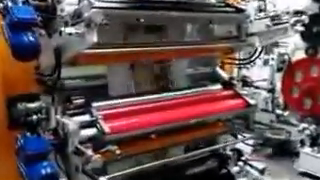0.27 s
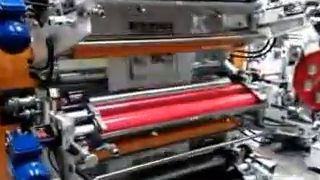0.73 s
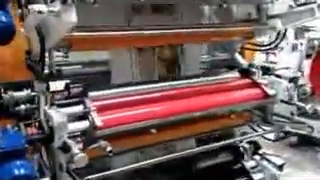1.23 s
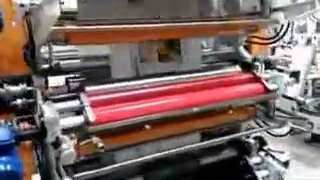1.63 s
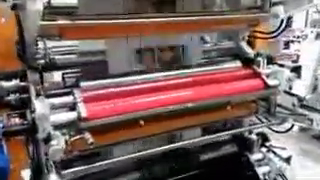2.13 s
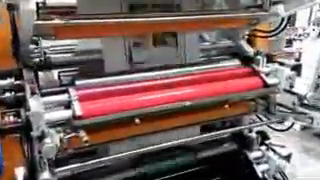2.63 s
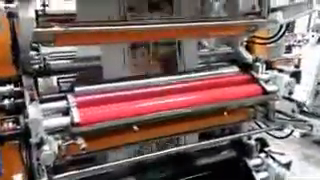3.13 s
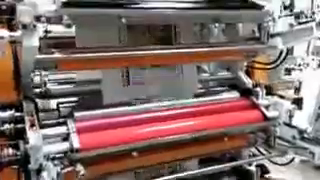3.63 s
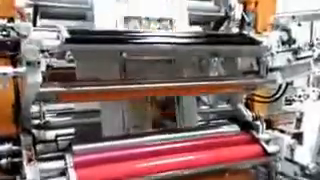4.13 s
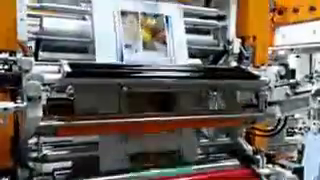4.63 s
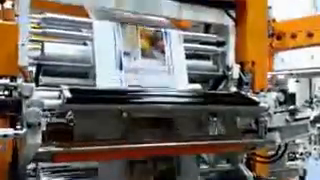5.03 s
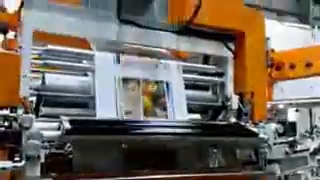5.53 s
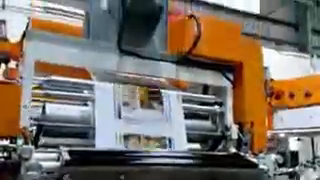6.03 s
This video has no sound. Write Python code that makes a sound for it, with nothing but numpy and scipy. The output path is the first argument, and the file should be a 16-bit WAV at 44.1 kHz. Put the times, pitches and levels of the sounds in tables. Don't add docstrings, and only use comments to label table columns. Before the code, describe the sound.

From 0 to about 6.3 seconds a roll-fed printing press runs without pause in a large factory hall. A thick, fairly level fan roar joins thin air hiss and dense metallic gear rattle, ringing mostly in the mid range. The rattle, hum and hiss swell gently about five times a second, never quite evenly. At 0.1 seconds an air valve vents with a soft-edged, breathy puff; at 0.65 a shorter, sharper one follows, both fading over the next second or so. Brief harder rattles poke out around 0.8, 1.4, 2.8, 3.7 and 4.7. Hiss is slightly fuller near 3. Wavering motor hum and a faint high whine grow clearer around 5 to 6. A small mono camera microphone moves along the press, with dull, slightly watery treble. It ends still running.

```python
import sys
import numpy as np
from scipy import signal
from scipy.fft import rfft, irfft, dct, next_fast_len
from scipy.io import wavfile
from scipy.ndimage import uniform_filter1d

SR = 44100
rng = np.random.default_rng(int(sys.argv[2]) if len(sys.argv) > 2 else 0)


def persist_wave(psi):
    counts = np.round(np.clip(psi, -1, 1) * 32767).astype(np.int16)
    wavfile.write(sys.argv[1], SR, np.atleast_2d(counts).T)


def level_to_linear(level):
    exponent = np.asarray(level, float) / 20
    return 10 ** exponent


N = 276948
TURN_HZ, TURN_PEAK_S = 5.09, 1.064


def rms_one(x):
    return x / np.sqrt(np.mean(x ** 2) + 1e-20)


def drift(rate_hz):
    every = 40
    r = np.exp(-2 * np.pi * rate_hz * every / SR)
    sparse = rng.standard_normal(N // every + 2002)
    slow = signal.lfilter([1], [1, -2 * r, r * r], sparse)[2000:]
    return np.interp(np.arange(N) / every, np.arange(len(slow)), rms_one(slow - slow.mean()))


def coloured(spectrum):
    size = next_fast_len(N)
    hz, level_db = np.transpose(spectrum)
    log_hz = np.log(np.arange(size // 2 + 1) * SR / size + 1)
    shape = level_to_linear(np.interp(log_hz, np.log(hz), level_db, left=-90, right=-90))
    return rms_one(irfft(rfft(rng.standard_normal(size)) * shape, size)[:N])


def resonance(x, hz, width_hz):
    r = np.exp(-np.pi * width_hz / SR)
    zeros = np.array([1, 0, -1]) * (1 - r * r) / 2
    return signal.lfilter(zeros, [1, -2 * r * np.cos(2 * np.pi * hz / SR), r * r], x)


def in_time(rows):
    s, *columns = np.transpose(rows)
    return [np.interp(np.arange(N) / SR, s, column) for column in columns]


def bump(at_s, half_width_s):
    return np.exp(-((np.arange(N) / SR - at_s) / half_width_s) ** 2)


def turn(t):
    return np.cos(2 * np.pi * TURN_HZ * (t - TURN_PEAK_S)) * (1 + 0.23 * drift(3.6))


# time_s, roar_db, hiss_db
WALK = [(0, -25, -35), (1, -24, -35), (2, -25, -33.5), (3, -24.5, -33), (3.6, -24.5, -35),
        (4.5, -25, -35.5), (5.4, -24.5, -35), (6.28, -24, -36)]


def walk_levels_db():
    return in_time(WALK)


# freq_hz, density_db_per_hz
FAN_SPECTRUM = [(12, -62), (20, -36.5), (135, -4), (270, -8), (368, -4), (424, -6.5), (467, -5), (700, -5),
                (1330, -4), (1860, -1), (2050, -6), (2310, -2), (4840, -9.5), (6000, -25.5), (7800, -54),
                (13200, -120)]


def dryer_fans(load, roar_db):
    return coloured(FAN_SPECTRUM) * level_to_linear(roar_db + 0.29 * load + 0.3 * drift(4.0))


# freq_hz, density_db_per_hz
KNIFE_SPECTRUM = [(2500, -21), (4000, -6), (5200, -11), (6200, -13.5), (7000, -20), (7800, -23),
                  (8050, -21), (8200, -31.5), (8400, -25), (8800, -33.5)]


def air_knives(load, hiss_db):
    return coloured(KNIFE_SPECTRUM) * level_to_linear(hiss_db + 1.1 * load + 0.44 * drift(6.7))


# mean_db, swell_per_turn_db
TRAIN_LEVELS = [
    (-30.5, 1.1),
    (-32.5, 2.6),
    (-31.5, 0.28),
]
# time_s, drive_side_share, ink_rollers_share
TIGHTNESS = [(0, .3, .5), (1, .7, .6), (2, 0.94, .6), (2.7, .5, 1.5), (4, 1.3, 1.4), (4.4, 0.96, .4),
             (5.2, 0.98, .5), (6.28, 1.1, .4)]
# time_s, extra_db
BINDS = [
    [(1.3, 3.5), (1.5, 3.5), (2.64, 0), (4.58, 4.5), (4.83, 5), (5.18, 1), (5.57, 1.5), (6.15, 1)],
    [(.7, 4), (.86, 4.5), (2.24, 2.5), (2.83, 4), (3.21, 1.5), (5.41, 2.5)],
    [(.3, 2.5), (1.25, 4), (2.53, 3.5), (2.98, 2.1), (3.68, 4), (4.65, 3), (5.15, 2.5), (6.25, 3)],
]
BIND_HALF_S = (.045, 0.036, 0.083)


def train_levels_db(load):
    shares = in_time(TIGHTNESS) + [1]
    levels_db = []
    for (mean_db, swell_db), share, binds, half_s in zip(TRAIN_LEVELS, shares, BINDS, BIND_HALF_S):
        bind_db = sum(extra_db * bump(time_s, half_s) for time_s, extra_db in binds)
        levels_db.append(mean_db + swell_db * share * load + 0.5 * drift(4.0) + bind_db)
    return levels_db


# freq_hz, width_hz, under_train_db, swell_share
FRAME = [
    [(142.3, 39, -15.5, 0.22), (425.3, 28, -14, 1.6), (514.4, 50, -13, 0.33), (842, 60, -15.5, 0.58),
     (965, 50, -15.5, 0.37), (1084.3, 45, -8.5, 0.81), (1196, 40, -10, 1.1), (1275.5, 45, -6.5, 0.61),
     (1381, 75, -5, 1.1), (1474, 25, -11, 2.5)],
    [(1611.5, 50, -4, 1.2), (1702, 40, -5, 1.6), (5599, 30, -21, 0.65)],
    [(1963, 44, -6, 0.21), (2024, 55, -9.5, 0.34), (2096.5, 50, -3, 0.49), (2720, 180, -11.5, 0.4),
     (3417, 820, -7, 0.46)],
]


def gears(load):
    swell_depth_db = 0.62
    out = 0
    for train_db, modes in zip(train_levels_db(load), FRAME):
        for hz, width_hz, under_db, share in modes:
            struck = resonance(rng.standard_normal(N), hz, width_hz)
            body = rms_one(resonance(struck, hz, 2.8 * width_hz))
            out = out + body * level_to_linear(train_db + under_db + share * swell_depth_db * load)
    return out


def passing(spots):
    return [far_db + gain_db * bump(at_s, half_s) + 0.8 * drift(0.92)
            for far_db, at_s, gain_db, half_s in spots]


def tone(t, hz, level_db, waver_hz, sag_hz=0):
    sag = sag_hz * np.sin(2 * np.pi * TURN_HZ * (t - TURN_PEAK_S))
    slip = np.cumsum(waver_hz * drift(3.0) - sag) / SR
    phase = 2 * np.pi * (hz * t + slip + rng.random())
    return np.sqrt(2) * level_to_linear(level_db) * np.sin(phase)


HUM_HZ, HUM_BEAT_DB = (424.5, 589, 639.5, 1469), (4, .5, 1, 2)
HUM_WAVER_HZ, HUM_SAG_HZ = (2.5, .5, 1.2, 1.5), (7, 0, 1.5, 1.5)
# far_db_rms, at_s, gain_db, half_width_s
HUM_SPOTS = [(-43.5, 4.8, 2.5, 2.5), (-47.5, 5.95, 7.5, 1.0), (-45.5, 5.4, 2.5, .9), (-47, 1.45, 7, .4)]
# pitch_hz, level_db_rms
FAINT_HUM = [(160.5, -55.5), (213, -53), (316, -52), (483, -50.5)]


def motors(t, load):
    out = 0
    lines = zip(HUM_HZ, passing(HUM_SPOTS), HUM_BEAT_DB, HUM_WAVER_HZ, HUM_SAG_HZ)
    for hz, level_db, beat_db, waver_hz, sag_hz in lines:
        out = out + tone(t, hz, level_db + beat_db * load, waver_hz, sag_hz)
    for hz, level_db in FAINT_HUM:
        out = out + tone(t, hz, level_db + 3 * drift(1.3), waver_hz=1.6)
    return out


WHINE_HZ = (4000, 6171, 8064)
# far_db_rms, at_s, gain_db, half_width_s
WHINE_SPOTS = [(-56, 5.25, 9.5, .9), (-58, 2.2, 5, 1.3), (-62, 2.4, 7, 1.4)]
# pitch_hz, level_db_rms
SIDE_LINES = [(5965, -59), (6102, -61), (6853, -67), (7934, -67.5), (7971, -67.5), (8027, -68.5),
              (8321, -69)]


def drives(t, load):
    out = 0
    for hz, level_db in zip(WHINE_HZ, passing(WHINE_SPOTS)):
        out = out + tone(t, hz, level_db + 1.2 * load, waver_hz=0.8)
    for hz, level_db in SIDE_LINES:
        out = out + tone(t, hz, level_db + 2.1 * drift(1.5), waver_hz=0.99)
    return out


# start_s, level_db, rise_s, open_s, chuff_db
VENTS = [
    (.125, -25, .05, .075, -25.5),
    (.648, -23.5, .015, .05, -30),
]
# freq_hz, density_db_per_hz
VENT_SPECTRUM = [(900, -18.5), (1800, -5), (3300, 2.5), (5000, -3), (6500, -9), (8000, -16), (8700, -32)]


def valve(t):
    direct_t60_s, hall_t60_s = 0.74, 1.4
    air = coloured(VENT_SPECTRUM)
    chuff = rms_one(resonance(resonance(rng.standard_normal(N), 620, 600), 800, 700))
    out = 0
    for start_s, level_db, rise_s, open_s, chuff_db in VENTS:
        opening = np.clip((t - start_s) / max(rise_s, 1e-3), 0, 1)
        after_s = np.maximum(t - start_s - rise_s - open_s, 0)
        direct = level_to_linear(-60 * after_s / direct_t60_s)
        hall = 0.88 * level_to_linear(-60 * after_s / hall_t60_s)
        envelope = opening * np.hypot(direct, hall) / 1.36
        out = out + envelope * (level_to_linear(level_db) * air + level_to_linear(chuff_db) * chuff)
    return out


def scene():
    t = np.arange(N) / SR
    roar_db, hiss_db = walk_levels_db()
    load = turn(t)
    air = dryer_fans(load, roar_db) + air_knives(load, hiss_db)
    press = gears(load) + motors(t, load) + drives(t, load)
    return np.tile(air + press + valve(t), (2, 1))


# freq_hz, step_db
STEP = [(60, -32), (400, -27), (700, -23.5), (950, -21), (1200, -15.5), (2000, -15.5), (3000, -18),
        (4300, -18.5), (5300, -20), (6200, -20.5), (6600, -22.5), (7100, -26.5), (7600, -28.5), (7950, -26),
        (8300, -33), (8700, -34)]


def camera_rounding(x):
    hop, grid, cutoff_hz = 2048, 592, 8800
    lead = 2 * hop - grid
    padded = np.pad(x, (lead, 3 * hop))
    window = np.sin(np.pi * (np.arange(2 * hop) + .5) / (2 * hop))
    starts = np.arange(len(padded) // hop - 1) * hop
    frames = padded[starts[:, None] + np.arange(2 * hop)] * window
    a, b, c, d = np.split(frames, 4, axis=1)
    lines = dct(np.hstack([-c[:, ::-1] - d, a - b[:, ::-1]]), type=4, norm="ortho")

    hz = (np.arange(hop) + .5) * SR / (2 * hop)
    band = np.floor(np.log(1 + hz / 600) * 15).astype(int)
    table_hz, table_db = np.transpose(STEP)
    step_db = np.interp(np.log(hz), np.log(table_hz), table_db)
    centre_db = np.array([step_db[band == k].mean() for k in range(band[-1] + 1)])

    loud_db = 10 * np.log10(np.mean(lines ** 2, axis=1, keepdims=True) + 1e-9)
    by_frame = .8 * np.clip(loud_db - np.median(loud_db), -3, 6)
    by_frame = by_frame + .7 * rng.standard_normal((len(starts), 1))
    near = uniform_filter1d(lines ** 2, size=48, axis=1)[:, np.searchsorted(band, band) + 24]
    near_db = 10 * np.log10(near + 1e-12)
    follows = (near_db - np.median(near_db, axis=0)) * np.interp(hz, [5000, 6500], [0, .5])
    by_band = follows + 1.1 * rng.standard_normal((len(starts), len(centre_db)))[:, band]
    step = level_to_linear(1.5 * np.round((centre_db[band] + by_frame + by_band) / 1.5))

    levels = np.floor((np.abs(lines) / step) ** .75 + .4054)
    rounded = np.sign(lines) * levels ** (4 / 3) * step * (hz < cutoff_hz)
    late, early = np.split(dct(rounded, type=4, norm="ortho"), 2, axis=1)
    frames = np.hstack([early, -early[:, ::-1], -late[:, ::-1], -late]) * window
    out = np.pad(frames[:, :hop], ((0, 1), (0, 0))) + np.pad(frames[:, hop:], ((1, 0), (0, 0)))
    return out.ravel()[lead:][:N]


def top_cut(x):
    return signal.sosfilt(signal.butter(12, 8710, fs=SR, output="sos"), x)


def record(dry):
    limited = .8 * np.tanh(dry[0] / .8)
    mix = np.tile(camera_rounding(limited), (2, 1))
    return top_cut(mix)


dry = scene()
out = record(dry)
persist_wave(out)
```